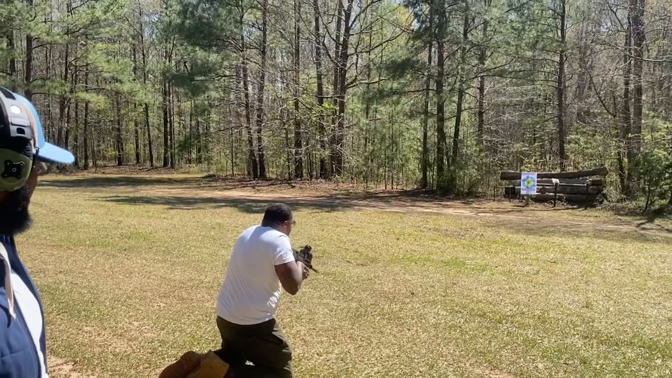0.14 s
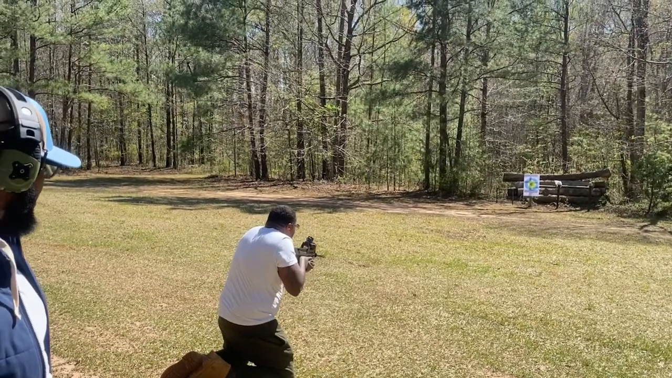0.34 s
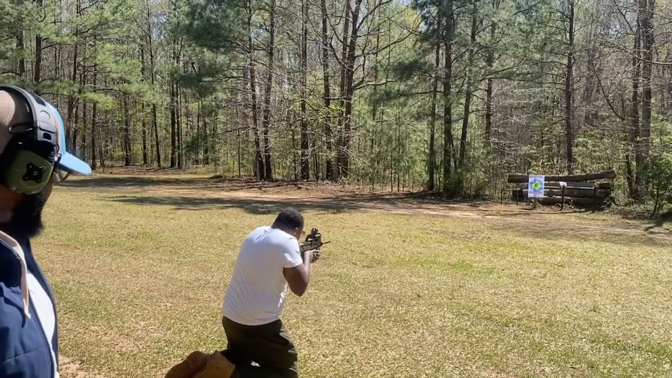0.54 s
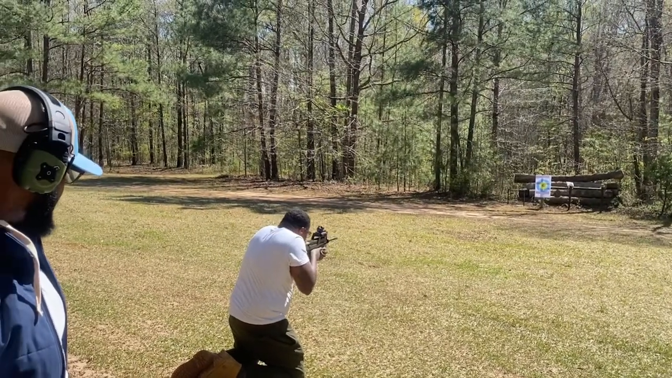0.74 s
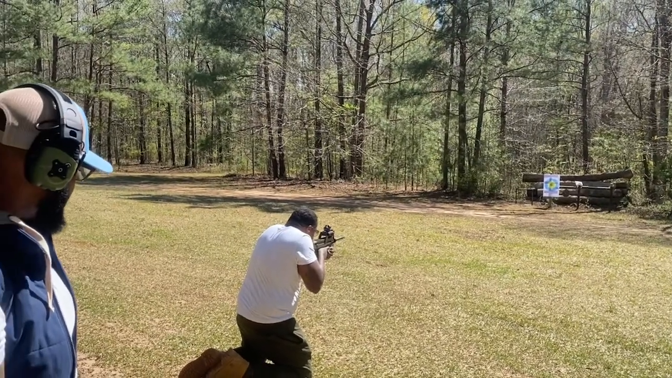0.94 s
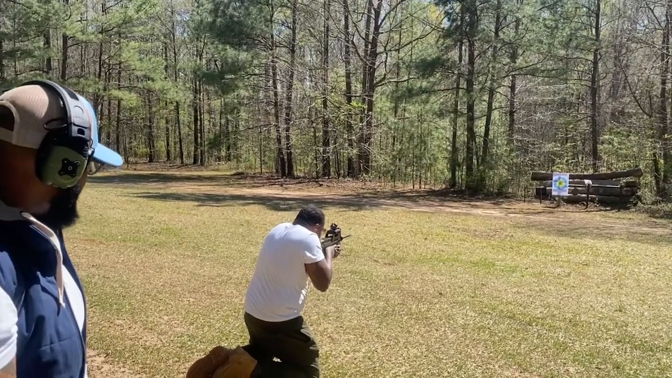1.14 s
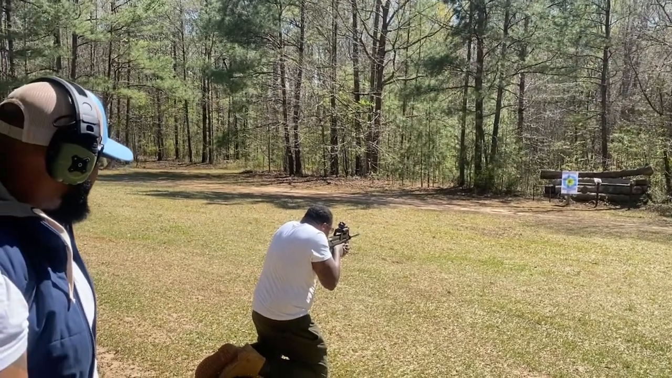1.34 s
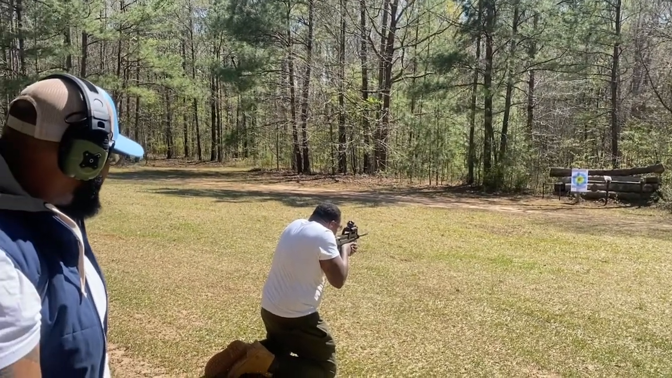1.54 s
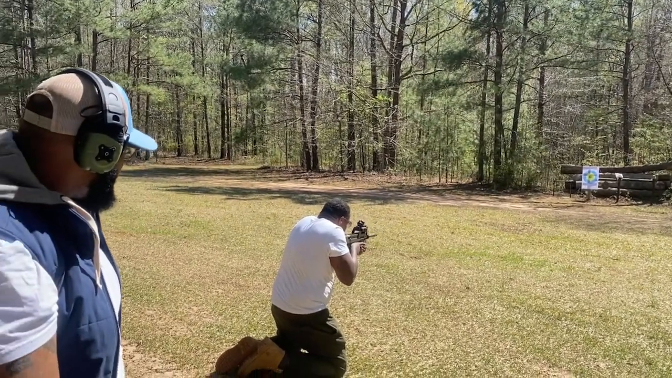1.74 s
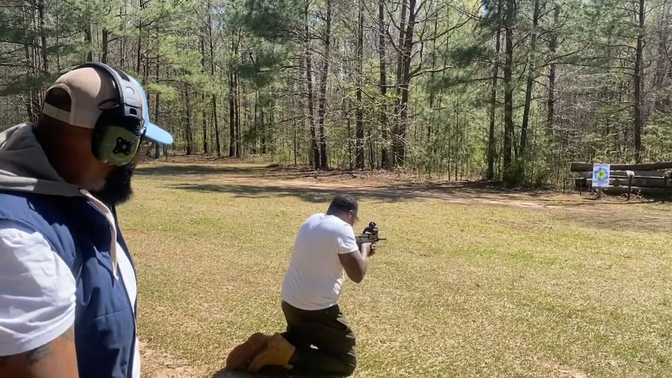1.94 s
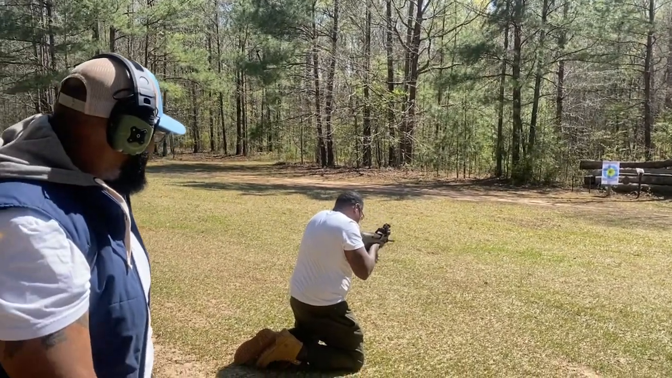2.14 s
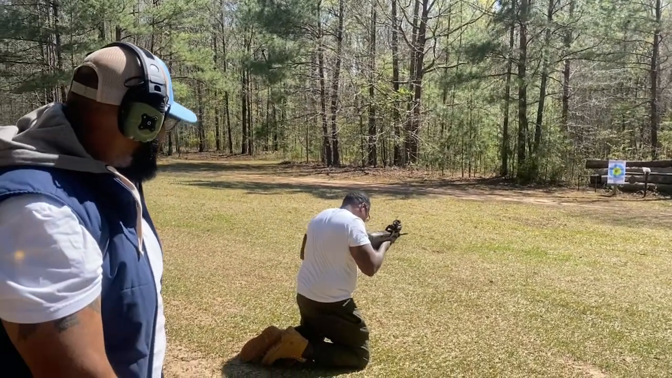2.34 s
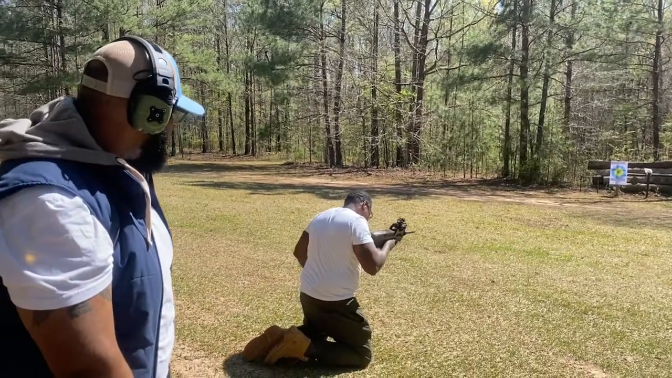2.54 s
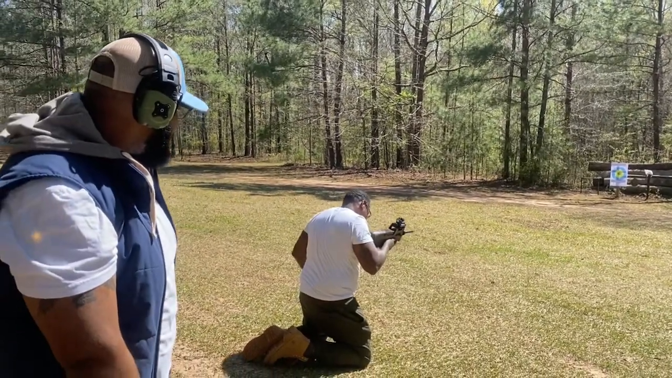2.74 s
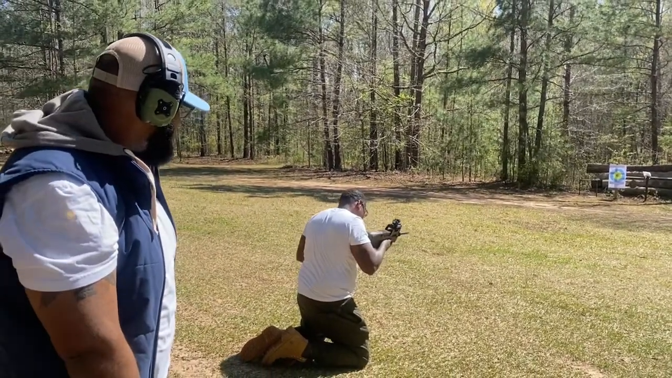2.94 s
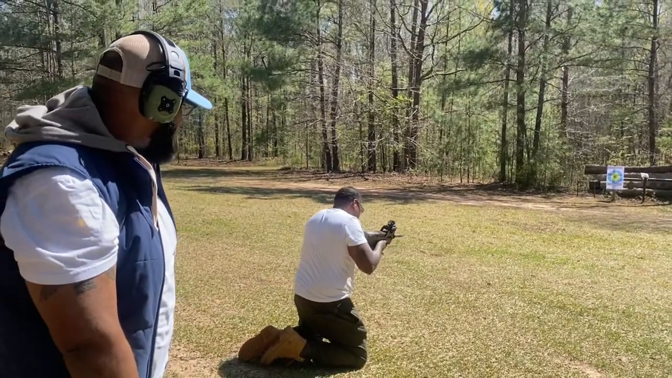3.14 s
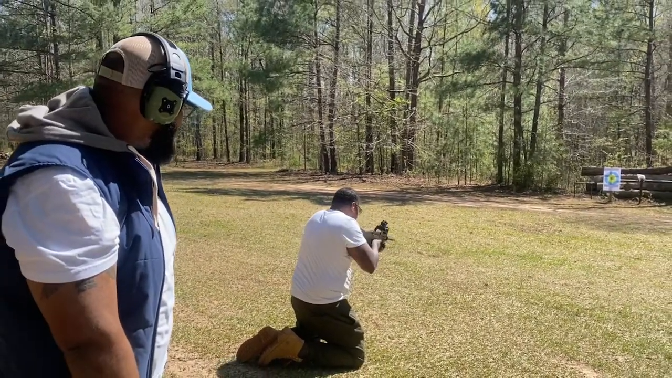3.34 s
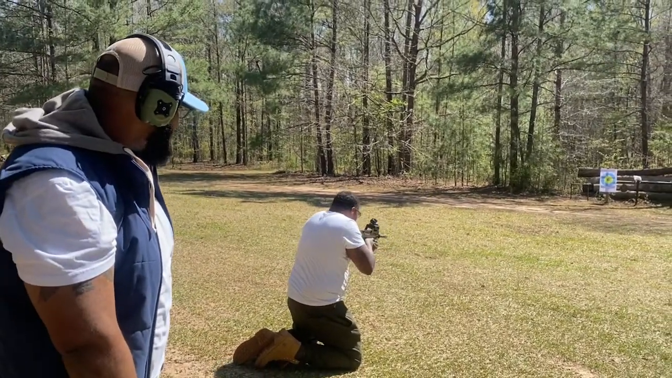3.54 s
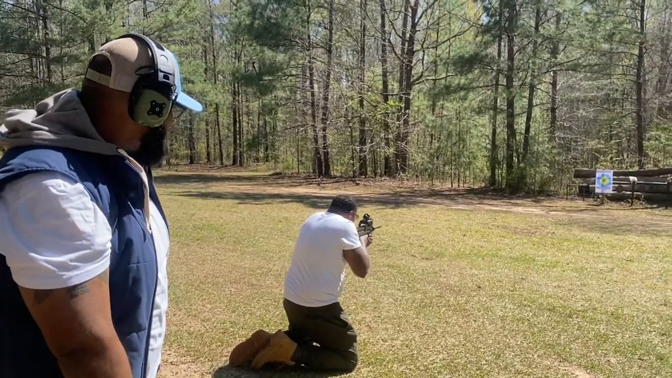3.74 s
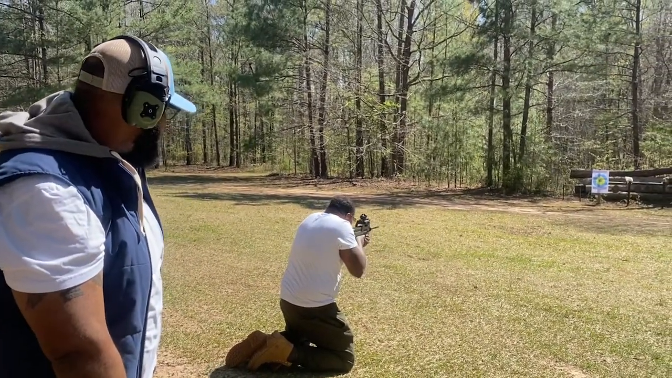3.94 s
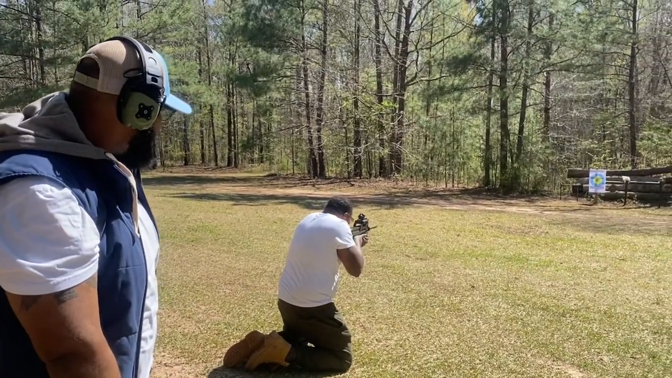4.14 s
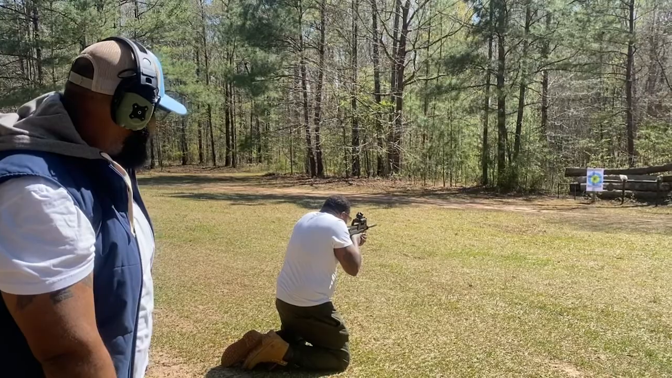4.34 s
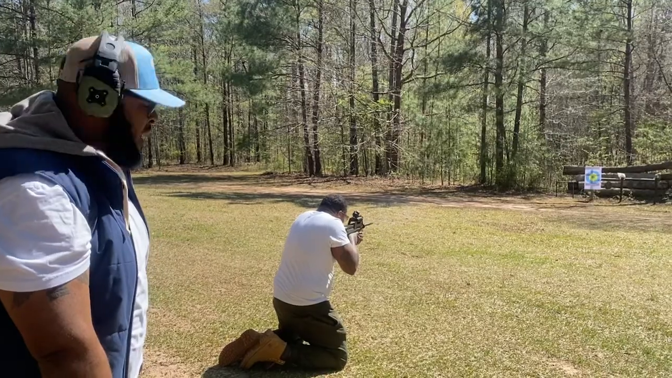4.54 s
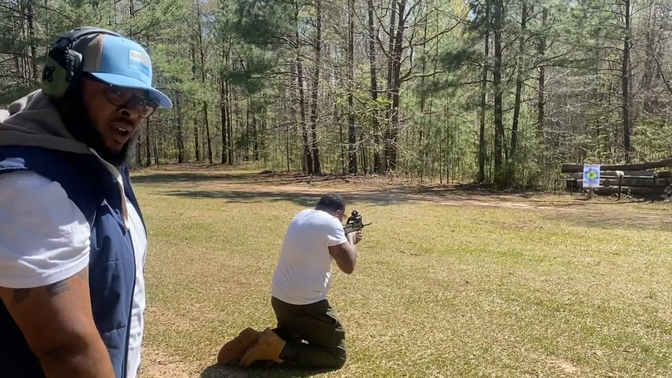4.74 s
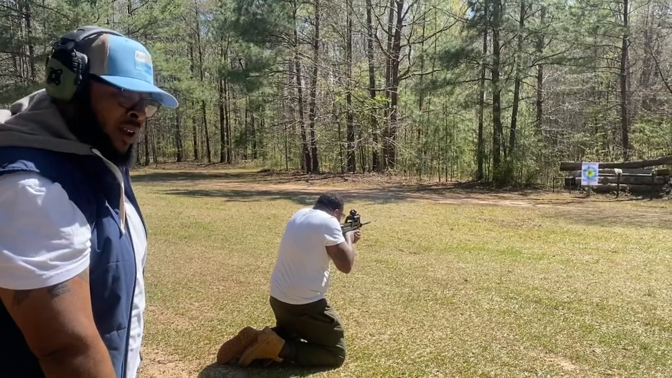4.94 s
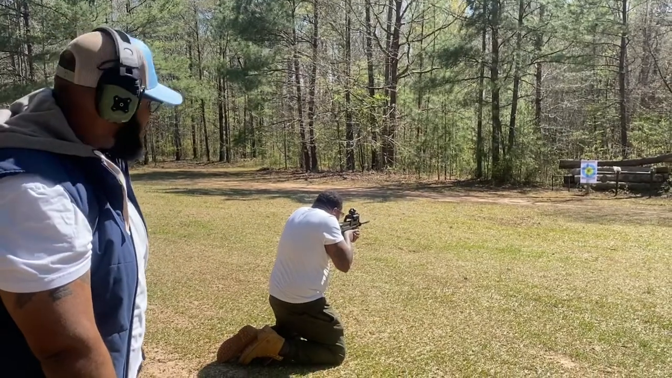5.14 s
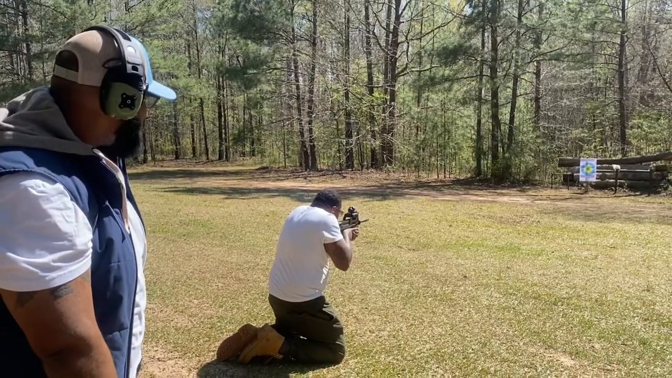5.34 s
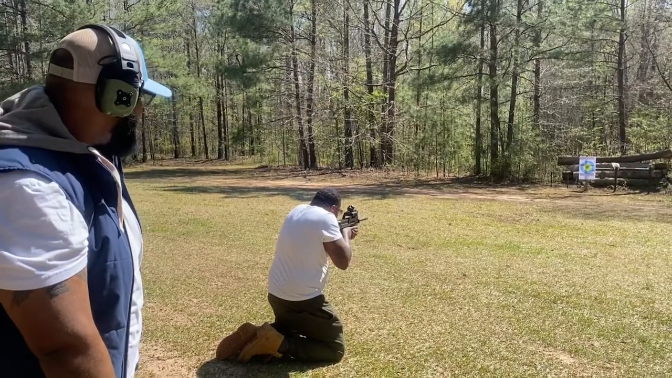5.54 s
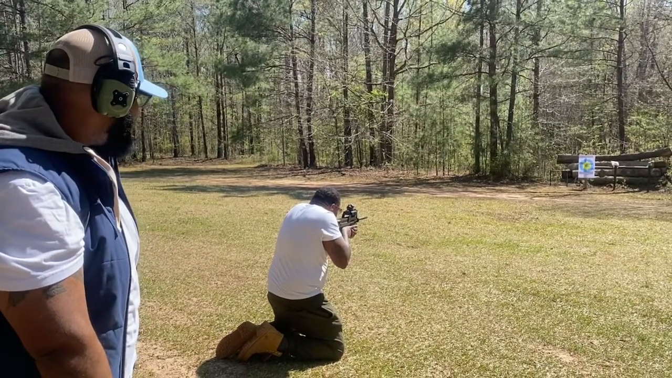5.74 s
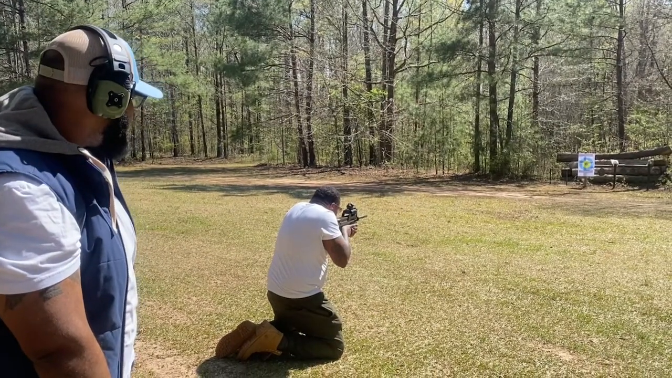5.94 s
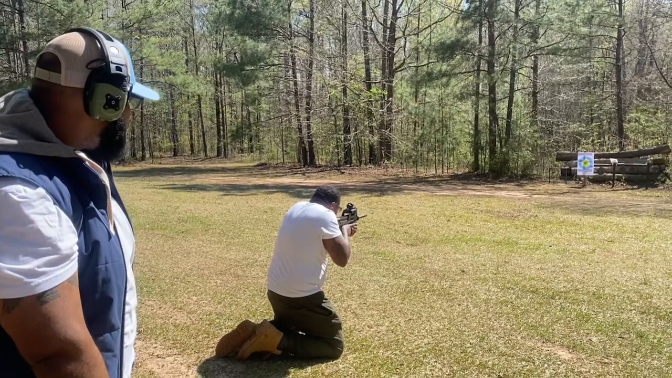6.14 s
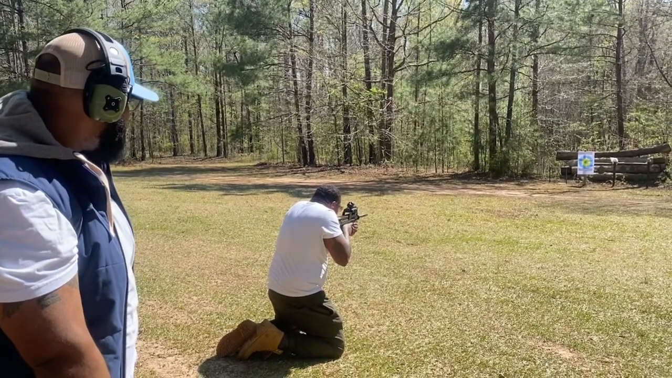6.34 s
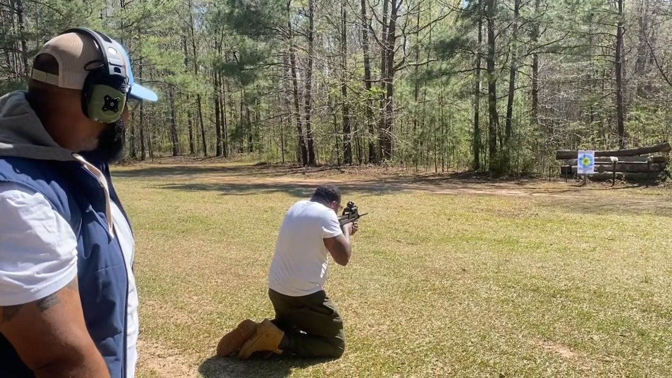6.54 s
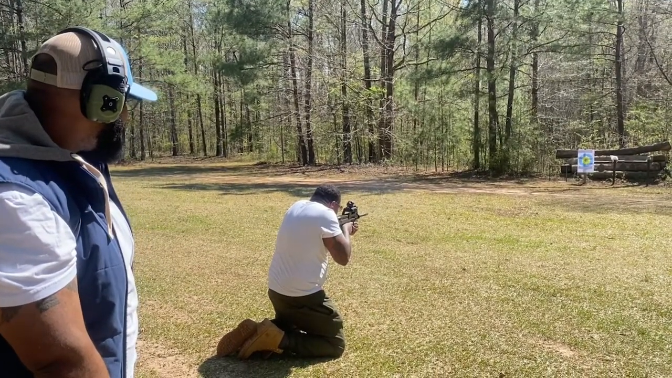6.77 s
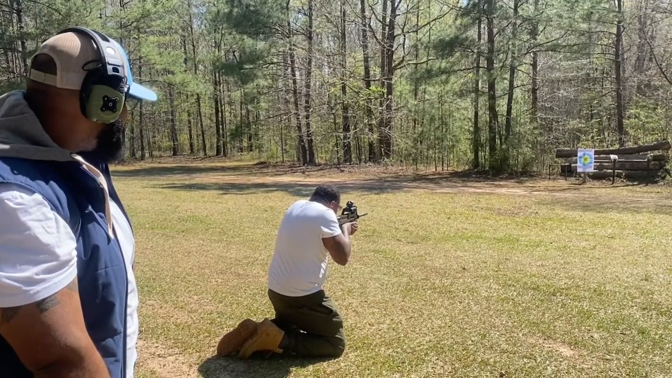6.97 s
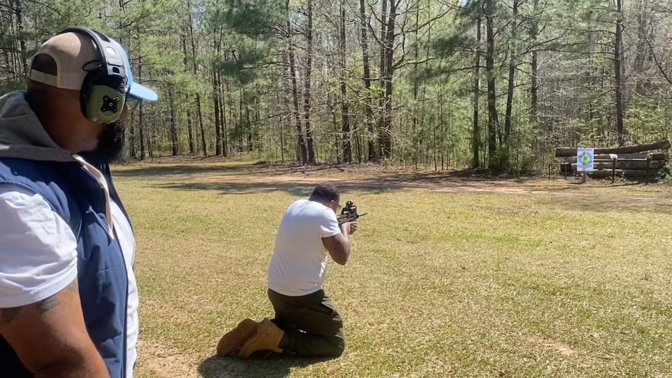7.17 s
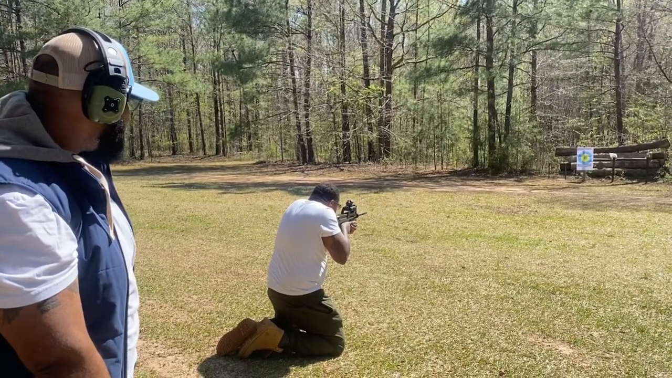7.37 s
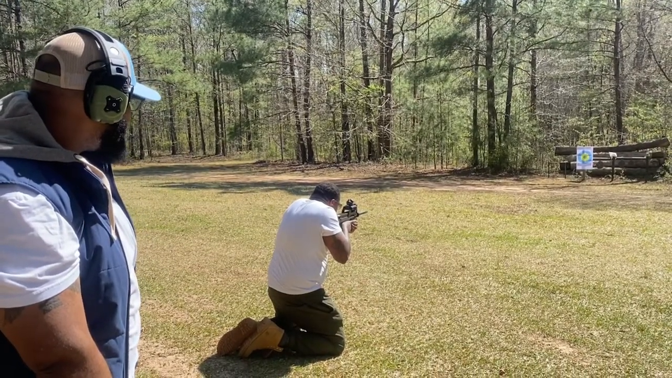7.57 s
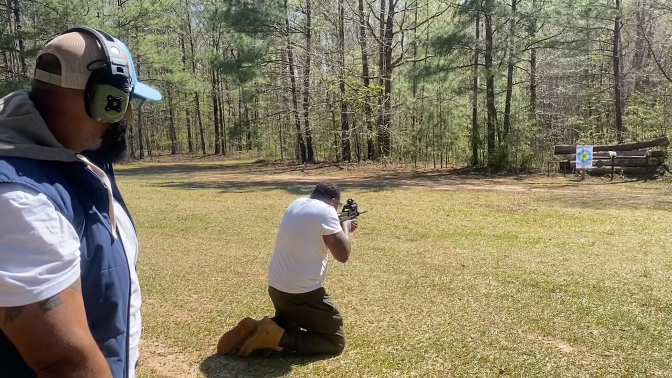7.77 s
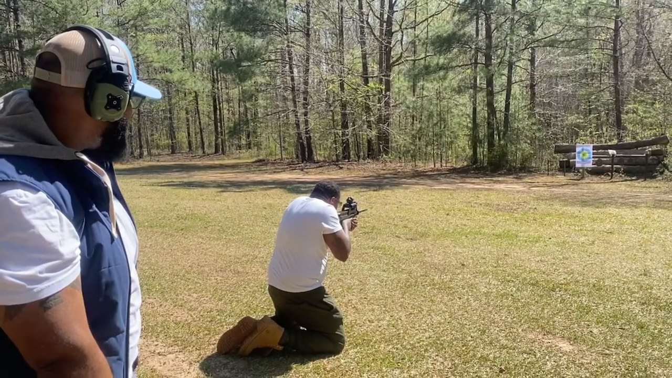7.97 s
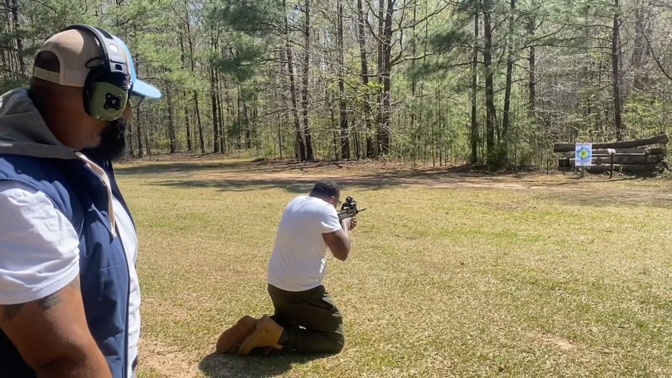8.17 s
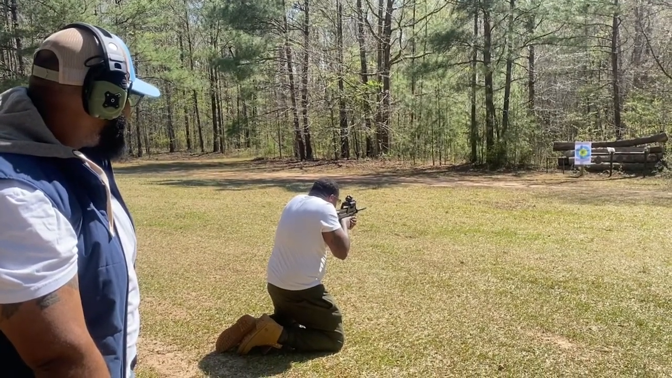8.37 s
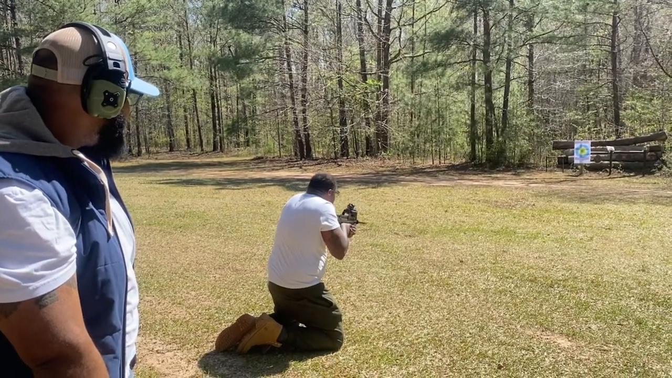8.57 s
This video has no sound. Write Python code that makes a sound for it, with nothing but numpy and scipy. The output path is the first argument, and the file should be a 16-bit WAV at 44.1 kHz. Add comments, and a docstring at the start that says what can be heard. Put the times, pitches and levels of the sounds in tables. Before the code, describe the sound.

Outdoors in a clearing ringed by trees, a fading echo of an earlier shot opens. A single sharp rifle crack follows, then after a pause a quick double, and two seconds later another double. Each blast overloads the nearby handheld microphone, with short slaps and a grainy roar from the trunks that dulls as it dies. Between shots come light wind, faint hiss, soft bumps and clothing rustles.

```python
"""Five rifle shots, one single and two quick pairs, in a grassy clearing ringed by woods. Each blast is a shock
front and noise crack, loud enough to overload the microphone; a low swing sinks after it. Noise grains build
the roar scattered back by the trunks, dulling as it travels; reflectors add short slaps. Between shots: light
wind and a thin high hiss of coloured noise, rubs, soft bumps of ringing modes, small clinks, and grainy rustles
and ticks of clothing."""
import sys
import numpy as np
from scipy import signal
from scipy.fft import rfft, irfft, next_fast_len
from scipy.io import wavfile
from scipy.ndimage import uniform_filter1d

SR = 44100
rng = np.random.default_rng(int(sys.argv[2]) if len(sys.argv) > 2 else 0)


def materialize(psi):
    """Save the field psi as 16-bit PCM at rate SR to the path in sys.argv[1].

    A 1-D psi becomes a single channel; in a 2-D psi each row is a channel.
    """
    bounded = np.clip(np.atleast_2d(psi).T, -1, 1)
    quanta = np.round(bounded * 32767).astype(np.int16)
    wavfile.write(sys.argv[1], SR, quanta)


N = 379695
TIME = np.arange(N) / SR


def from_db(db):
    """Decibels to gain."""
    return 10 ** (np.asarray(db) / 20)


def rms_one(x):
    """Scale to rms 1."""
    return x / np.sqrt(np.mean(x ** 2) + 1e-20)


def level(rows):
    """Gain over time from rows of (time [s], level [dB])."""
    return from_db(np.interp(TIME, *np.transpose(rows)))


def at_hz(points, hz):
    """Read a curve on a log-frequency axis."""
    f, value = np.transpose(points)
    return np.interp(np.log(np.maximum(hz, 1)), np.log(f), value)


def drift(rate):
    """Random wander about 0 with spread near 1, taking `rate` new targets a second."""
    knots = rng.standard_normal(N // 8)
    return 1.2 * np.interp(TIME * rate, np.arange(len(knots)), knots)


def pair(mid, side, alike):
    """Left and right with a given correlation, from two independent noises."""
    alike = np.clip(alike, -1, 1)
    return np.sqrt(1 + alike) * mid + np.sqrt(1 - alike) * side * np.array([[1], [-1]])


# left-right likeness of the microphone pair: (frequency [Hz], correlation [-1 to 1])
LIKENESS = [(330, .999), (520, 0.31), (1100, 0.88), (2000, 0.46), (2600, 0.18), (3500, 0.43), (5300, .4),
            (6400, 0.73), (7700, 0.3), (9000, 1)]


def noise(colour, width=1):
    """Stereo noise of rms 1 with a given colour; width 0 is mono, 1 the full spread of the pair."""
    size = next_fast_len(N)
    hz = np.arange(size // 2 + 1) * SR / size
    mid, side = rfft(rng.standard_normal((2, size)))
    both = pair(mid, side, 1 - width * (1 - at_hz(LIKENESS, hz)))
    return rms_one(irfft(both * from_db(at_hz(colour, hz)), size)[:, :N])


def burst(age, rise, hold, decay):
    """Envelope that swells up to age 0, holds and dies away."""
    swell = np.minimum(age, 0) / rise
    fall = np.maximum(age - hold, 0) / decay
    return np.exp(np.maximum(swell - fall, -40))


def strokes(rows, rest_db, rise, fade):
    """Gain of movements (time [s], length [s], level [dB]) that swell, hold and fade over a resting level."""
    moving = sum(from_db(db) * burst(TIME - at, rise, length, fade) for at, length, db in rows)
    return from_db(rest_db) + moving


def swing(age, hz, decay):
    """A pressure swing that starts at age 0 and dies away exponentially."""
    age = np.maximum(age, 0)
    return np.sin(2 * np.pi * hz * age) * np.exp(-age / decay)


# loss in the air at 1 kHz [dB per s of travel], and how steeply it grows with frequency
AIR_DB_PER_S, AIR_POWER = 5.0, 1.315


def air_loss(hz):
    """Decibels that the air takes per second of travel, against the loss at 2 kHz."""
    return AIR_DB_PER_S * ((hz / 1000) ** AIR_POWER - 2 ** AIR_POWER)


TREELINE_S, BUILD_DB_PER_S = 0.13, 230.5   # the roar builds until the nearest trees have answered
# a far stand of trees answers late, in a narrow band
FAR_TREES_S, FAR_SPREAD_S, FAR_HZ, FAR_OCTAVES = 0.638, .09, 1860, 0.84


def roar_gain(age, hz, db, hold, fade_db_per_s, far_db):
    """One shot's roar builds, holds, then thins with distance while the air takes its treble."""
    build = -BUILD_DB_PER_S * np.maximum(TREELINE_S - age, 0)
    fade = -fade_db_per_s * np.maximum(age - hold, 0) - air_loss(hz) * np.maximum(age, 0)
    far_time = (age - FAR_TREES_S) / FAR_SPREAD_S
    far_pitch = np.log2(np.maximum(hz, 1) / FAR_HZ) / FAR_OCTAVES
    far = far_db * np.exp(-far_time ** 2 - far_pitch ** 2)
    return (age > 0) * from_db(db + build + fade + far) * hold / np.maximum(age, hold)


EARLIER_SHOT_S = -0.93   # a shot just before the start; its roar is still dying away
DIP_DB, DIP_S = 4.5, 0.1   # the roar dips briefly after each blast
# shots: (time [s], crack level [dB], crack rise [s], shock level [dB], knock level [dB], knock pitch [Hz],
#         thump level [dB], boom level [dB], settled boom pitch [Hz], boom decay [s],
#         near scatter level before its envelope [dB]); also times the roar and the slaps
SHOTS = [(1.0874, -13, 0.0031, -11, -19, 530, -19, -28, 72, 0.014, -32),
         (4.4968, -11.5, 0.0029, -13, -12, 607.3, -4.5, -14, 74.9, 0.014, -28),
         (4.6938, -9.5, 0.0017, -15.5, -15, 557.6, -24, -31, 86.5, 0.01, -30.5),
         (6.4755, -13.5, 0.0018, -9.5, -11, 611.4, -21.5, -22.5, 71.2, 0.017, -26.5),
         (6.6718, -10, 0.0011, -17, -12, 645, -19.5, -19, 67.3, 0.017, -29)]
# roars of the earlier shot, then of each of the five:
# (level [dB], hold after the shot [s], fade [dB per s], swell from the far trees [dB])
ROARS = [(-29, 0.27, 25.5, 0), (-27.5, 0.3, 17, 7), (-27.5, 0.28, 17, 5.5), (-29, 0.36, 25, 2.5),
         (-27.5, 0.43, 22.5, 10.5), (-26.5, 0.42, 24.5, 4)]
# fresh colour of the roar: (frequency [Hz], level [dB per Hz])
WOODS_COLOUR = [(50, -17.5), (90, -19), (200, -14.5), (380, -19.5), (550, -6), (800, -4), (1100, -3),
                (1500, -0.5), (1900, 4), (2500, 2.5), (3300, 3), (5000, 1), (7600, 0), (8400, 5.5),
                (11000, 4.5), (15000, -4)]
# level lean of the roar: (frequency [Hz], left minus right [dB])
ROAR_LEAN = [(330, 4), (650, -1.8), (1100, .5), (1600, 1.15), (2450, 4), (3200, 2.5), (5000, 4.5),
             (6500, 1), (9000, -0.4)]


def woods(grain_db, grain_s, flutter_db):
    """Countless trunk echoes merge into a roar; the later they come, the more treble the air has taken."""
    fired = np.array([EARLIER_SHOT_S] + [shot[0] for shot in SHOTS])
    since = TIME - fired[np.searchsorted(fired, TIME) - 1]
    # early echoes stand apart as grains, late ones blend
    graininess = grain_db * np.exp(-since / grain_s)
    grains = from_db(graininess * (drift(1500) + .5 * drift(170)))
    grains /= np.sqrt(uniform_filter1d(grains ** 2, size=2048))
    hz, s, white = signal.stft(rng.standard_normal((2, N)) * grains, SR, nperseg=1024)
    # the roars of all shots add in power
    power = sum(roar_gain(s - at, hz[:, None], *row) ** 2 for at, row in zip(fired, ROARS))
    held = np.sqrt(power)
    # echoes of like delay interfere, so patches of the spectrum come and go
    patches = uniform_filter1d(rng.standard_normal(held.shape), size=3, axis=0)
    patches = rms_one(uniform_filter1d(patches, size=3, axis=1))
    colour = held * from_db(at_hz(WOODS_COLOUR, hz)[:, None] + flutter_db * patches)
    left, right = stereo_bins(white, hz)
    lean = from_db(at_hz(ROAR_LEAN, hz) / 2)[:, None]
    roar = signal.istft(colour * np.array([left * lean, right / lean]), SR)[1][:, :N]
    return roar * from_db(-DIP_DB * np.exp(-(since / DIP_S) ** 2))


def stereo_bins(white, hz):
    """Spread two noise spectrograms over left and right by the likeness of the microphone pair."""
    alike = np.clip(at_hz(LIKENESS, hz), -1, 1)[:, None]
    mid, side = np.sqrt(1 + alike) * white[0], np.sqrt(1 - alike) * white[1]
    return mid + side, mid - side


WIND_GAIN_DB = 3   # lift of the whole wind
GUST_RATE, GUST_DB = 22, 2.8   # gusts per second, and their spread [dB]
STILL_AIR_DB = -83   # level of the clearing's hush
# wind on the microphone, before the lift and gusts: (time [s], level [dB])
WIND = [(0.0, -73), (0.84, -76.5), (1.05, -80), (1.27, -64), (2.03, -73), (2.42, -63), (2.56, -70.5),
        (3.9, -59), (4.19, -65), (4.55, -57), (4.76, -59), (5.25, -52), (6.06, -63), (6.3, -66), (6.9, -51),
        (7.35, -55), (8.46, -71), (8.6, -75)]
# colour of the wind: (frequency [Hz], level [dB per Hz])
WIND_COLOUR = [(20, -9.5), (40, -1), (80, 6), (130, 0), (200, -7), (350, -12.5), (700, -25.5),
               (1500, -58.5)]
# colour of the clearing's hush: (frequency [Hz], level [dB per Hz])
STILL_AIR_COLOUR = [(100, -5), (700, -7), (1500, -6.5), (3000, -17), (8000, -25), (15000, -36)]
# thin high hiss: (time [s], level [dB])
HISS = [(0, -86.5), (1.0, -79), (2.3, -80), (4.4, -81), (4.9, -90.5), (5.6, -92), (6.3, -89), (7.2, -103.5),
        (8.6, -99)]
# colour of the hiss: (frequency [Hz], level [dB per Hz])
HISS_COLOUR = [(8000, -40.5), (9100, -21), (9500, -8), (9950, -0.5), (10250, -20), (11500, -34.5)]


def background():
    """Lumpy wind on the microphone, the hush of the clearing and a thin high hiss, all shaped noise."""
    gusts = from_db(WIND_GAIN_DB + GUST_DB * drift(GUST_RATE))
    wind = level(WIND) * gusts * noise(WIND_COLOUR, width=.05)
    hush = from_db(STILL_AIR_DB) * noise(STILL_AIR_COLOUR)
    return wind + hush + level(HISS) * noise(HISS_COLOUR)


MOVE_RISE_S, MOVE_FADE_S, REST_DB = 0.046, .04, -100   # how a movement starts and ends; rustle at rest
# small ticks during a movement: rate, level against its rustle, and spread
CREASES_PER_S, CREASE_DB, CREASE_SPREAD_DB = 32, 16, 7
# movements that rustle the clothing, before the grain: (time [s], length [s], level [dB])
MOVES = [(.42, .46, -85), (2.25, 0.093, -87), (3.427, 0.51, -82), (4.198, 0.06, -83), (5.407, 0.12, -83),
         (5.938, 0.28, -88)]
# the clearest ticks of clothing: (time [s], level [dB])
TICKS = [(0.7346, -48), (0.809, -56), (0.854, -60), (0.9487, -58), (0.98, -58), (1.748, -53.5),
         (2.2902, -56.5), (2.354, -55), (3.7634, -51), (3.8512, -50.5), (4.2188, -57.5), (5.949, -58.5),
         (5.989, -59), (6.1343, -57.5), (8.158, -58)]
# colour of the fabric: (frequency [Hz], level [dB per Hz])
FABRIC_COLOUR = [(1500, -24), (4000, -10), (7500, -4.5), (8400, -0.5), (10300, 8), (12000, -3.5),
                 (15500, -1.5)]


def clothing():
    """Each movement gives a grainy rustle in which stiff creases snap at random as tiny bright ticks."""
    loudness = strokes(MOVES, REST_DB, MOVE_RISE_S, MOVE_FADE_S) * from_db(4.3 * drift(260))
    # one possible snap per 10 ms on average; the rate decides which ones sound
    slots = rng.random((N // 441, 2))
    times = slots[:, 0] * N / SR
    chances = slots[:, 1] * len(slots) * SR / N
    snaps = zip(times, chances, rng.uniform(-1.1, 1, len(slots)))
    creases = [(at, db + CREASE_DB + CREASE_SPREAD_DB * size)
               for at, chance, size in snaps
               for start, length, db in MOVES
               if chance < CREASES_PER_S and start < at < start + length]
    for at, db in list(TICKS) + creases:
        span = slice(int(at * SR), int(at * SR) + SR // 20)
        age = TIME[span] - at - .0006
        loudness[span] += from_db(db) * burst(age, rise=0.00017, hold=0.00033, decay=0.0013)
    return loudness * noise(FABRIC_COLOUR)


def pressure_pulse(age, length):
    """A shock front, then a longer suction."""
    phase = np.maximum(age, 0) / length
    return (age > 0) * (1 - phase) * np.exp(-phase)


def boom(age, hz, glide, glide_s):
    """The low swing after the blast, sinking from (1 + glide) times its settled pitch."""
    age = np.maximum(age, 0)
    return -np.sin(2 * np.pi * hz * (age + glide * glide_s * (1 - np.exp(-age / glide_s))))


KNOCK_DELAY_S = .001   # the knock follows the shock front, with suction first
# the blast's hollow knock: (multiple of knock pitch [ratio], level against the knock [dB], decay [s])
KNOCK = [(.9, 1.5, 0.0032), (1.139, -2, 0.004)]
# colour of the crack: (frequency [Hz], level [dB per Hz])
CRACK_COLOUR = [(200, -10), (560, 2), (950, -0.5), (1250, 0), (1550, -5), (1950, 1.5), (2700, -6.5),
                (4000, -4), (7600, -10), (8300, 4.5), (10000, -1), (12000, -4), (15500, -6)]
# colour of the scatter off the ground nearby: (frequency [Hz], level [dB per Hz])
NEAR_COLOUR = [(150, -7), (550, 0), (1000, -3.5), (2000, -4.5), (4000, -5), (7600, -8), (8300, 3),
               (10000, 1), (12000, -4), (15500, -10.5)]


def blasts():
    """Shock front and ground bounce, a tearing crack and near scatter, then a knock, thump and boom."""
    pulses, crack, near = np.zeros((3, N))
    for (at, crack_db, rise, shock_db, knock_db, knock_hz,
         thump_db, boom_db, boom_hz, boom_s, near_db) in SHOTS:
        span = slice(int(at * SR) - SR // 10, int(at * SR) + SR)
        age = TIME[span] - at
        bounce = 0.42 * pressure_pulse(age - .0019, length=.00009)
        shock = pressure_pulse(age, length=.00008) + bounce
        knock = -sum(from_db(db) * swing(age - KNOCK_DELAY_S, knock_hz * ratio, decay)
                     for ratio, db, decay in KNOCK)
        # thump and boom share one swing: a short strong start and a longer tail
        late = np.maximum(age - .0033, 0)
        weight = from_db(thump_db) * np.exp(-late / 0.0022) + from_db(boom_db) * np.exp(-late / boom_s)
        low = weight * boom(late, boom_hz, glide=2.1, glide_s=.0045)
        pulses[span] += from_db(shock_db) * shock + from_db(knock_db) * knock + low
        crack[span] += from_db(crack_db) * burst(age, rise, hold=0.0018, decay=0.0017)
        scatter = 2.8 * np.exp(-np.abs(age) / 0.01) + .5 * np.exp(-np.abs(age) / .08)
        near[span] += from_db(near_db) * (age > 0) * scatter
    tearing = crack * noise(CRACK_COLOUR, width=0.24) * from_db(3.8 * drift(2500))
    return pulses + tearing + near * noise(NEAR_COLOUR, width=0.76)


# fixed reflectors around the clearing answer every shot:
# (delay [s], level [dB], decay [s], centre [Hz])
REFLECTORS = [(.078, -30.5, .009, 890), (.1003, -29, .004, 7000), (.129, -34, .015, 580),
              (.225, -37, .012, 590)]
# strength of those answers, one per shot: level [dB]
SLAP_DB = [-6, -1.5, -1, -0.5, -0.5]
# stray sharp returns that come only once: (time [s], level [dB], decay [s], centre [Hz])
STRAYS = [(1.248, -25, .0011, 5060), (4.618, -29.5, .004, 2004), (4.794, -23, .004, 6335),
          (6.655, -21.5, .005, 2178), (6.763, -24.5, .003, 3400), (6.938, -22.5, .002, 3000),
          (7.061, -21, .004, 2080)]


def slaps():
    """Single reflectors return a shot as a short slap with its own colour, duller the farther it has come."""
    out, size = np.zeros((2, N)), 4096
    age, hz = TIME[:size], np.arange(1, size // 2 + 2) * SR / size
    answers = [(shot[0] + delay, shot_db + db, decay, centre_hz)
               for shot, shot_db in zip(SHOTS, SLAP_DB)
               for delay, db, decay, centre_hz in REFLECTORS]
    for at, db, decay, centre_hz in answers + list(STRAYS):
        travel = min(at - shot[0] for shot in SHOTS if shot[0] < at)
        band = 1 + (1.2 * (hz / centre_hz - centre_hz / hz)) ** 2
        colour = from_db(-air_loss(hz) * travel) / band
        both = pair(*rfft(rng.standard_normal((2, size))), at_hz(LIKENESS, hz))
        slap = rms_one(irfft(colour * both))
        start = int(at * SR)
        out[:, start:start + size] += from_db(db) * slap * np.minimum(1, 1.1 * np.exp(-age / decay))
    return out


def ring(clicks, hz, t60):
    """A unit click sets a sine of height 1 ringing, 60 dB down after t60 seconds."""
    r, w = from_db(-60 / (t60 * SR)), 2 * np.pi * hz / SR
    return signal.lfilter([0, np.sin(w)], [1, -2 * r * np.cos(w), r * r], clicks + 1e-18)


GRIP_DB, RUB_RISE_S, RUB_FADE_S = -73, .07, 0.086   # the resting hand; how a rub starts and ends
# band of the bumps: lower and upper edge [Hz]
BUMP_BAND_HZ = (170, 640)
# bumps on the housing, before the modes and random spread: (time [s], level [dB])
BUMPS = [(2.47, -49.5), (3.0304, -35.5), (3.111, -40.5), (3.120, -36), (3.154, -45.5), (3.169, -36),
         (3.198, -43), (4.06, -44), (4.1, -45), (4.168, -46.5), (4.273, -47.5), (5.52, -44), (7.862, -43)]
# modes of the housing: (frequency [Hz], level [dB], t60 [s])
BODY_MODES = [(238, -10.5, 0.058), (362, -5.5, 0.027), (497.6, -1, 0.048), (561, -16, 0.063)]
# the hand shifts its grip: (time [s], length [s], level [dB])
RUBS = [(2.64, 0.27, -60), (3.1, 0.088, -54.5), (4.13, .28, -64.5)]
# colour of the rubbing: (frequency [Hz], level [dB per Hz])
GRIP_COLOUR = [(100, -14), (220, -7), (380, -10), (480, 3.5), (550, 7.5), (680, -23.5), (1000, -33.5),
               (2500, -50)]


def handling():
    """The hand rubs and softly bumps the housing, which rings dully."""
    at, db = np.transpose(BUMPS)
    knocks = np.zeros(N)
    for hz, mode_db, t60 in BODY_MODES:
        clicks = np.zeros(N)
        clicks[(at * SR).astype(int)] = from_db(db + mode_db + rng.normal(0, 1.5, len(at)))
        knocks += ring(clicks, hz, t60)
    band = signal.butter(4, BUMP_BAND_HZ, "band", fs=SR, output="sos")
    knocks = signal.sosfilt(band, knocks)
    grip = strokes(RUBS, GRIP_DB, RUB_RISE_S, RUB_FADE_S)
    rubbing = grip * noise(GRIP_COLOUR, width=0.23) * from_db(2.0 * drift(40))
    return (knocks + rubbing) * from_db([[-.8], [.8]])   # leans right


# small rings of nearby gear: (time [s], level [dB], pitch [Hz], decay [s])
CLINKS = [(3.167, -60.5, 1755, 0.013), (6.191, -60, 3960, 0.003)]


def clinks():
    """Small hard parts touch and ring briefly as dying sines."""
    return sum(from_db(db) * swing(TIME - at, hz, decay) for at, db, hz, decay in CLINKS)


def scene():
    """The shots, their echoes and the quiet between them."""
    roar = woods(grain_db=2.0, grain_s=0.61, flutter_db=2.0)
    return blasts() + slaps() + roar + handling() + clinks() + clothing() + background()


CUTOFF_HZ = 16800   # 70 dB down from here up
# the housing sheds the deepest bass and colours the low middle: (frequency [Hz], level [dB])
HOUSING = [(25, -6.5), (55, -0.5), (160, 1.5), (230, 1), (340, 1), (430, -2), (520, 2), (700, 0.5),
           (900, 0)]
# phase between the two channels: (frequency [Hz], lead of the left [rad])
PORT_PHASE = [(0, 0.5), (150, -1), (400, -1.25), (950, 0.96), (1500, 0.73), (2250, -0.9), (2900, 1.45),
              (4400, -0.1), (5500, 1.7), (6400, 0), (7500, -0.4), (8200, -3), (10000, -6), (16000, -16)]
# the pair narrows towards mono in the bass: (frequency [Hz], side level [dB])
WIDTH = [(100, -16), (200, -18), (330, -10), (480, -4.5), (900, -2.5), (2000, 0)]


def record(dry):
    """Housing colour and phase offsets, soft overload of the blasts, narrowed bass and a cut top."""
    top, size = .85, next_fast_len(N + SR // 10)   # top: ceiling of the overload
    hz = np.arange(size // 2 + 1) * SR / size
    phase = np.interp(hz, *np.transpose(PORT_PHASE))
    turn = np.exp(1j * phase * np.array([[.5], [-.5]]))
    turned = irfft(rfft(dry, size) * from_db(at_hz(HOUSING, hz)) * turn, size)
    left, right = top * np.tanh(turned / top)
    side = irfft(rfft(left - right) * from_db(at_hz(WIDTH, hz)), size)
    heard = np.array([left + right + side, left + right - side])[:, :N] / 2
    return signal.sosfilt(signal.cheby2(16, 70, CUTOFF_HZ, fs=SR, output="sos"), heard)


dry = scene()
out = record(dry)
materialize(out)
```